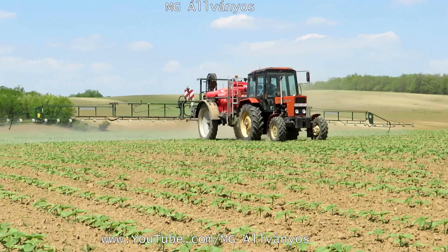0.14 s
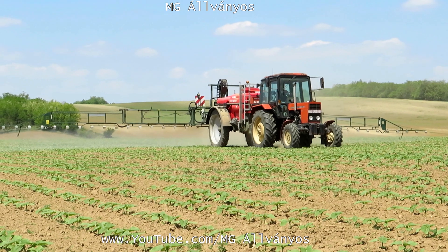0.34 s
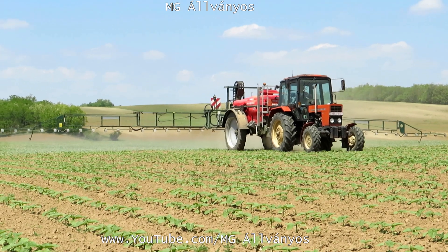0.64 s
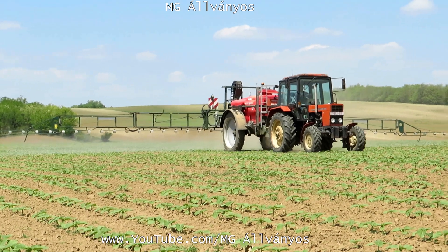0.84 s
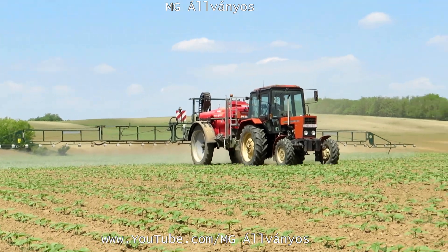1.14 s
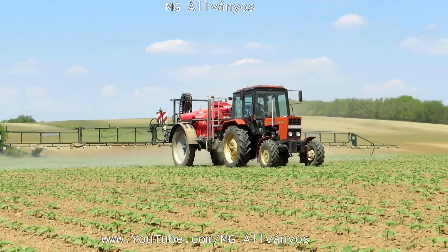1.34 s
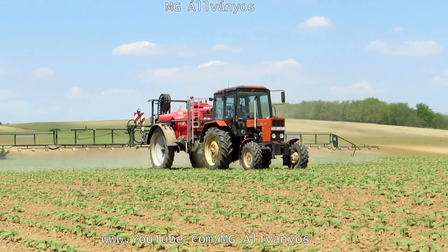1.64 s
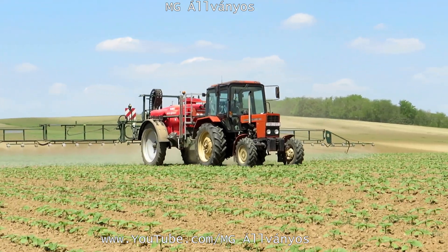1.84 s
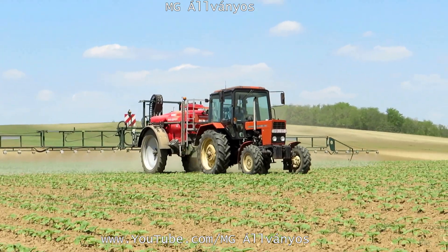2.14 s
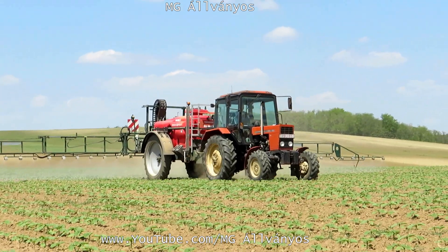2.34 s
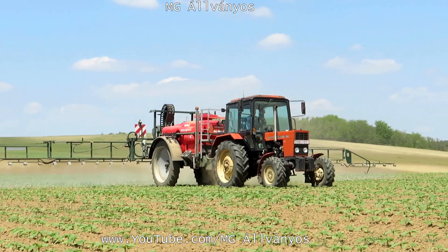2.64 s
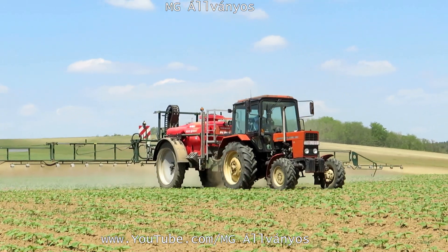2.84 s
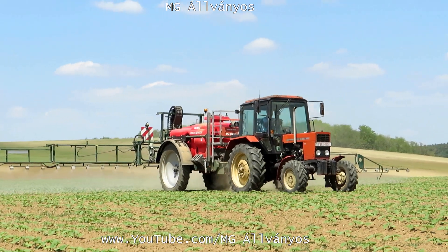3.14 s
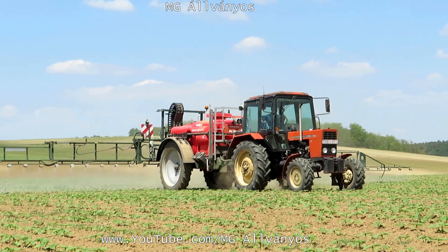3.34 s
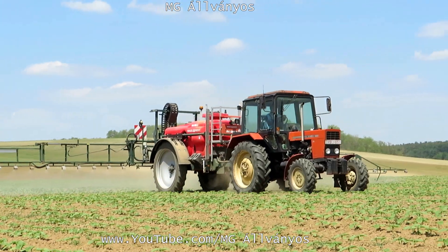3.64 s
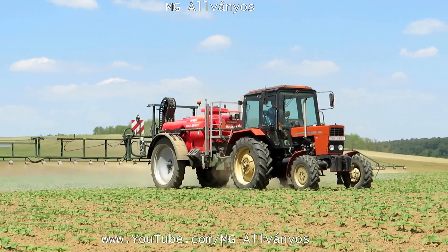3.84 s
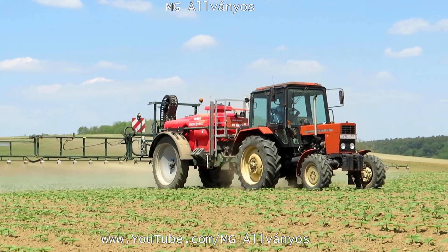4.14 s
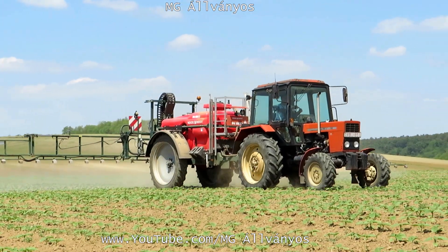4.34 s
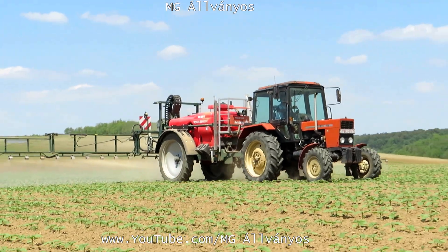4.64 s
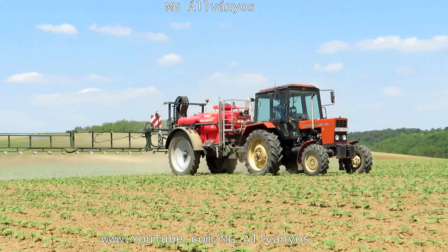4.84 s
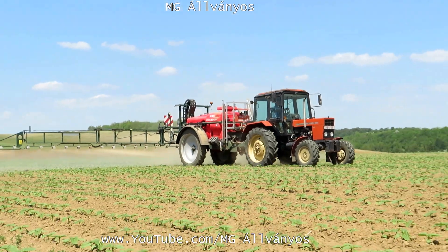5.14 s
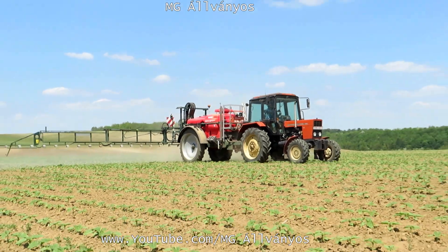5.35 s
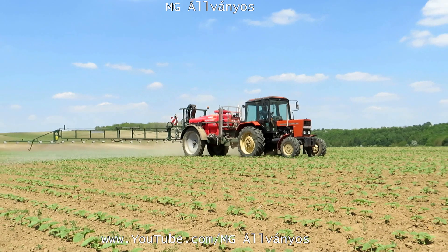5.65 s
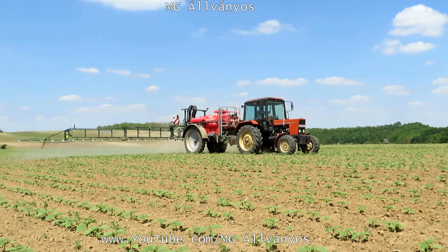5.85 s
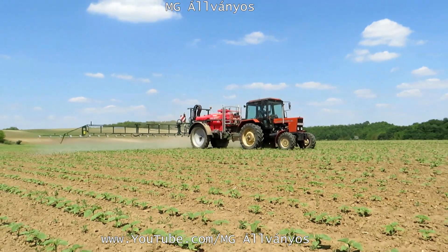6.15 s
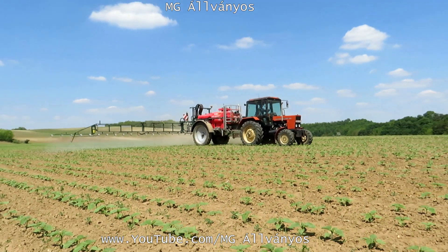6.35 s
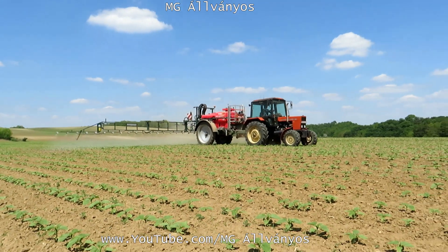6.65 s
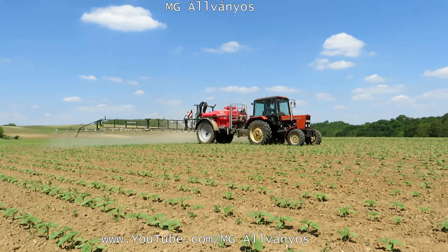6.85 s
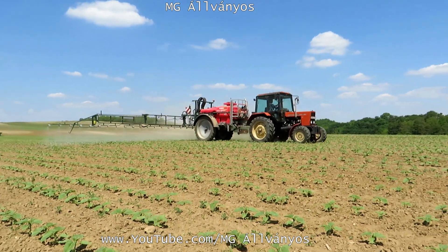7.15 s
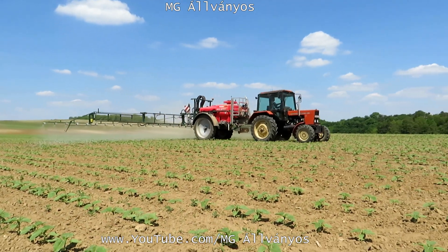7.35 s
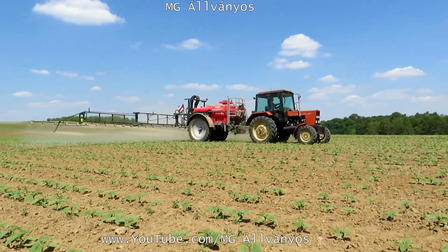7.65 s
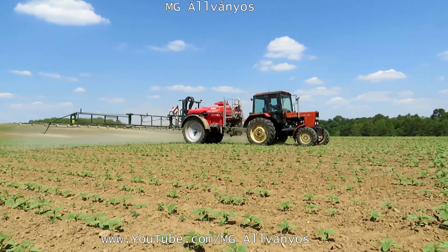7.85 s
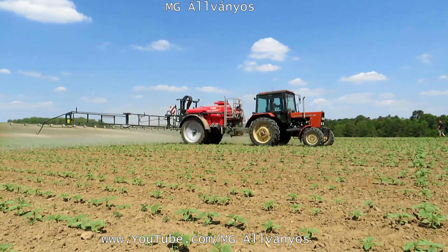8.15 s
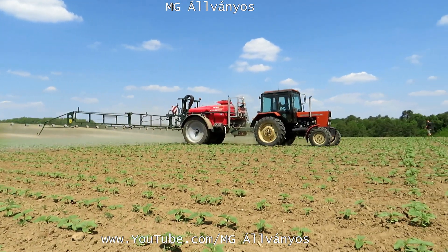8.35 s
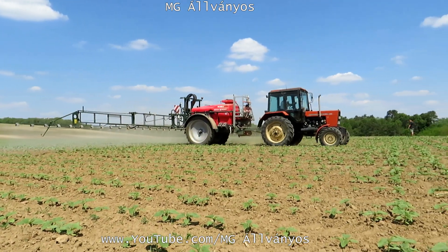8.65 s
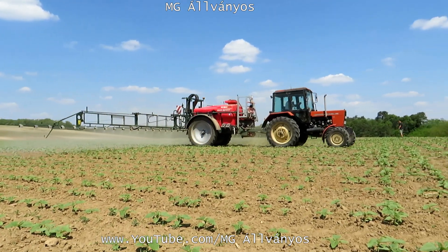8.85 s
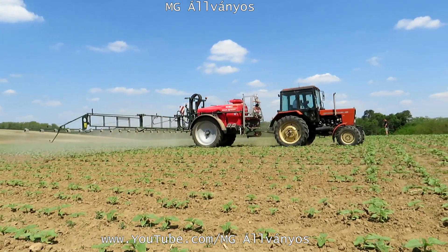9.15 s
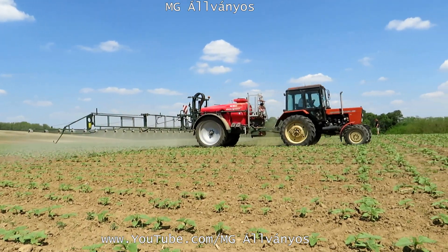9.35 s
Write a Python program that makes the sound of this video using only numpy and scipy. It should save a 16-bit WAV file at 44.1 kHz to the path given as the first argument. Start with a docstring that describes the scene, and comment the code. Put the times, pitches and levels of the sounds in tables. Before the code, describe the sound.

A short low gust buffets the microphone, a tiny dropout follows, then a diesel tractor swells quickly from faint to full within the first second and a half. Its deep drone carries rapid exhaust puffs with one louder bark per cycle, knocks, block buzz and fan roar. Speed and loudness sway slightly. Near the end the throttle closes, the bark softens and pitch sags. Open field, nearly mono, dry, with faint ground reflection.

```python
"""A short gust hits the microphone, then a four-cylinder diesel tractor drones nearer and passes in a field.
The drone is a stack of sine waves tied to the crank. Noise puffs at every firing and barks once a cycle
on one loud cylinder; knocks, block buzz and fan roar join in, and the ground throws part of it back.
Speed and loudness sway as the governor hunts, and a few dry ticks stand out.
Near the end the throttle closes: the bark almost stops, the note sags, and some fuel returns last."""
import sys
import numpy as np
from scipy import signal
from scipy.fft import rfft, irfft, next_fast_len
from scipy.io import wavfile
from scipy.ndimage import uniform_filter1d, map_coordinates

SR = 44100
rng = np.random.default_rng(int(sys.argv[2]) if len(sys.argv) > 2 else 0)


def pcm_store(signal):
    """Save signal as 16-bit PCM."""
    levels = np.round(np.clip(np.atleast_2d(signal), -1, 1) * 32767)
    wavfile.write(sys.argv[1], SR, levels.astype(np.int16).T)


N = 419391
TIME = np.arange(N) / SR  # s

# the four firings of a cycle, loud cylinder first: delay after the beat [firings],
# puff level_db [dB], decay [firings]
CYLINDERS = [(-0.073, 17.5, 0.34), (-0.065, 9, 0.43), (-0.04, 9.5, 0.42), (0, 4.5, 0.61)]
# how far the engine's flank has turned to the microphone: start_s [s], turn [0 nose on - 1 side on]
FLANK_TURN = [(0, 0.21), (4, 0.049), (5.5, 0.51), (7, 1), (9.5, 1)]
# colour of the exhaust's fizzing treble: pitch_hz [Hz], level_db [dB per Hz, relative]
FIZZ_COLOUR = [(2000, -61), (3400, 4), (4200, 3.5), (5200, 0), (6200, -5), (7200, -12.5), (8500, -36.5),
               (12000, -87)]


def amp(db):
    """Decibels to gain."""
    return 10 ** (np.asarray(db) / 20)


def evened(x):
    """Scales to an rms (average strength) of 1."""
    return x / np.sqrt(np.mean(x ** 2) + 1e-20)


def steadied(x):
    """Scales to rms 1 over every few engine cycles, so single puffs keep their shape."""
    window = 5740  # samples
    power = uniform_filter1d(uniform_filter1d(x ** 2, size=window), size=window)
    return x / np.sqrt(abs(power) + 1e-20)


def curves(rows):
    """Joins the rows of a table into one curve per column, with a value for every sample."""
    start_s, *columns = np.transpose(rows)
    return [np.interp(TIME, start_s, column) for column in columns]


def colour(x, points):
    """Filters with the given spectrum, never sounding ahead of its input (minimum phase)."""
    pitch_hz, level_db = np.transpose(points)
    f = abs(np.fft.fftfreq(8192, 1 / SR))
    log_gain = np.log(amp(np.interp(np.log(f + 1), np.log(pitch_hz), level_db)))
    taps = np.fft.ifft(np.exp(np.conj(signal.hilbert(log_gain)))).real
    return signal.oaconvolve(x, taps[:len(taps) // 2])[:N]


def wander(rate_hz):
    """A smooth random curve of rms 1 that varies at rates up to about rate_hz."""
    f = np.fft.rfftfreq(N, 1 / SR)
    smooth = rfft(rng.standard_normal(N)) * np.exp(-(f / rate_hz) ** 2)
    return evened(irfft(smooth, N))


def resonate(x, hz, width_hz):
    """A resonance of gain 1 that follows the curve hz: shift it to 0 Hz, smooth, shift back."""
    turn = np.exp(2j * np.pi * np.cumsum(hz) / SR)
    r = np.exp(-np.pi * width_hz / SR)
    return 2 * (turn * signal.lfilter([1 - r], [1, -r], x / turn)).real


def gust(end_s=0.1045, fade_s=0.0092, lump_db=4, level_db=-12):
    """Wind buffets the microphone for a moment: mostly low noise that comes in lumps."""
    # colour of the wind: pitch_hz [Hz], level_db [dB per Hz, relative]
    wind_colour = [(15, -35), (25, -19), (54, 1.5), (143, 0), (250, -3.5), (426, -12), (620, -24.5),
                   (1100, -31.5), (3000, -66), (6000, -54), (10000, -64), (15000, -75)]
    wind = colour(rng.standard_normal(N), wind_colour) * amp(lump_db * np.tanh(wander(70)))
    fade = np.clip((end_s - TIME) / fade_s + .5, 0, 1)
    return amp(level_db) * wind / np.std(wind[TIME < end_s]) * fade


def governor(time):
    """The governor hunts: two slow swings of the speed that beat, in firings per second."""
    # rate [swings per second], depth [firings per second], time of a crest [s]
    swings = [(2.376, 0.19, 0.008), (2.032, 0.2, 0.245)]
    return sum(depth * np.cos(2 * np.pi * rate * (time - crest)) for rate, depth, crest in swings)


def surge(swing_db=2, lead_s=0.17, ease_s=0.075):
    """Loudness in dB that fuel adds or takes: extra fuel is heard before the speed rises."""
    # the load lets up for a moment and the governor trims the fuel: middle of the dip [s], level_db [dB]
    eases = [(2.17, -3), (4.3, -2), (4.7, -2.5), (6.76, -1), (8.39, -2)]
    dips = sum(db * np.exp(-((TIME - s) / ease_s) ** 2) for s, db in eases)
    return swing_db * governor(TIME + lead_s) + dips  # swing_db per firing a second


def facing(nose_db, side_db):
    """A level that moves between its nose-on and side-on values as the tractor turns its flank."""
    return nose_db + (side_db - nose_db) * curves(FLANK_TURN)[0]


def drone(firings, throttle, lift_db, lag=1.26, uneven_lag=0.017, ring_lag=0.08,
          soften_db=-8, hoot_db=4, waver=0.096, side_waver=0.14):
    """Pressure waves from the stack; unequal cylinders fill in the orders between the firing lines."""
    # order [waves per four-stroke cycle], level_db [dB, before the changes below]
    orders = [(1, -13), (2, -11.5), (3, -31), (4, 0), (5, -17.5), (6, -28), (7, -36), (8, -1.43), (9, -18),
              (10, -34), (11, -12), (12, -5), (13, -11.5), (14, -40), (15, -20), (16, -10), (17, -18),
              (18, -50), (19, -12.5), (20, -28), (21, -68), (22, -38.5), (23, -25.5)]
    boom_order = 11
    cylinders = len(CYLINDERS)
    # less fuel: rounder, hollower pulses
    soft = amp(soften_db * (1 - throttle))
    hoot = amp(hoot_db * (1 - throttle))
    wavers = [1 + side_waver * wander(3.8) for _ in CYLINDERS]
    out = np.zeros(N)
    for order, db in orders:
        gain = amp(db) * min(order / cylinders, 1) ** 2  # an open pipe radiates little below the firing rate
        late = lag  # in firings
        if order % cylinders:
            gain = gain * wavers[order % cylinders]
            late = late + uneven_lag
        if order == boom_order:  # this order rings on in the pipe
            gain = gain * amp(lift_db)
            late = late + ring_lag
        elif order > boom_order:
            gain = gain * soft
        elif order == 2 * cylinders:
            gain = gain * hoot
        out -= gain * np.sin(2 * np.pi * order * (firings - late) / cylinders)
    low = signal.sosfilt(signal.butter(6, 145, fs=SR, output="sos"), out)
    return out / np.std(low) * (1 + waver * wander(5.7))  # the part below 145 Hz sets the level


def per_cycle(firings, spread_db):
    """A random gain, new for each cycle of four firings."""
    cycle = (firings // len(CYLINDERS)).astype(int)
    return amp(spread_db * np.clip(rng.standard_normal(N), -2, 2))[cycle]


def puffs(firings, throttle, bark_db, rise=0.095, coast=0.4, spread_db=1.8):
    """Gas flow: each exhaust valve lets out a jet that dies away; the first cylinder barks."""
    flow = np.ones(N)
    for k, (delay, db, decay) in enumerate(CYLINDERS):
        since = firings - k - delay + len(CYLINDERS)
        age = since % len(CYLINDERS)  # in firings, as are rise and decay
        if k == 0:
            strength = throttle * amp(bark_db)
        else:
            strength = coast + (1 - coast) * throttle
        jet = (1 - np.exp(-(age / rise) ** 2)) * np.exp(-age / decay)
        flow += (amp(db) * strength * per_cycle(since, spread_db) * jet) ** 2
    return np.sqrt(flow)


def turbulence(firings, repeat):
    """Noise of which a share returns at the same crank angle each cycle, its pattern slowly changing."""
    size = 2870  # steps in a cycle
    place = (firings / len(CYLINDERS) % 1 * size).astype(int)
    patterns = rng.standard_normal((7, size))
    stage = TIME / TIME[-1] * (len(patterns) - 1)
    locked = np.zeros(N)
    for k, pattern in enumerate(patterns):
        locked += pattern[place] * np.sqrt(np.clip(1 - abs(stage - k), 0, 1))  # crossfade
    share = np.clip(repeat, 0, 1)
    return np.sqrt(share) * locked + np.sqrt(1 - share) * rng.standard_normal(N)


def rumble(flow):
    """Low noise that follows the gas flow only faintly."""
    # pitch_hz [Hz], level_db [dB per Hz, relative]
    rumble_colour = [(20, -31.5), (45, -10), (90, 3.5), (170, 2), (260, 0), (400, -6.5), (600, -12.5),
                     (900, -21), (1500, -26.5), (4000, -63.5)]
    return steadied(colour(rng.standard_normal(N) * flow ** 0.14, rumble_colour))


def roar(firings, flow):
    """The steady roar of fan and block: noise that hardly follows the puffs."""
    # pitch_hz [Hz], level_db [dB per Hz, relative]
    roar_colour = [(500, -28.5), (700, -5), (850, 3), (1100, 4.5), (1300, -6.5), (1700, -7), (3000, -45),
                   (8000, -94)]
    return steadied(colour(turbulence(firings, repeat=0.24) * flow ** 0.05, roar_colour))


def buzz(firings, flow):
    """The engine block buzzes in step with the crank: noise that repeats every cycle."""
    # pitch_hz [Hz], level_db [dB per Hz, relative]
    buzz_colour = [(220, -29), (350, 1), (450, -3.5), (580, -10), (720, -1.5), (850, -9.5), (1200, -10.5),
                   (2500, -46.5), (8000, -95)]
    return steadied(colour(turbulence(firings, repeat=1.0) * flow ** .5, buzz_colour))


def thump(firings, speed, ring_hz=630, width_s=0.0013, spread_db=1.3):
    """The loud cylinder's valve opens with a short hollow knock: a sine wave that swells and dies."""
    since = firings + 2
    t = (since % len(CYLINDERS) - 2) / speed  # s from the middle of the knock
    knock = np.exp(-(t / width_s) ** 2) * np.sin(2 * np.pi * ring_hz * t)
    return evened(knock * per_cycle(since, spread_db))


def panel(knock, pitch_hz=576, width_hz=18):
    """Some sheet-metal panel rings on after every knock, at one narrow resonance."""
    return evened(resonate(knock, np.full(N, pitch_hz), width_hz))


def ground(x, comb):
    """The grazing echo off the soil comes back inverted and combs the sound."""
    # echo: start_s [s], delay_ms [ms], strength [share, scaled by comb]
    soil_echo = [(0, 1.19, 0.2), (1.3, 1.42, 0.06), (4, 1.41, 0.03), (5, 1.334, 0.18), (7, 1.44, 0.2),
                 (8.2, 1.25, 0.32), (9.5, 1.19, 0.2)]
    # a hollow that sweeps down the treble, then part way up again, as the tractor passes:
    # start_s [s], pitch_hz [Hz], depth [0-1]
    sweep = [(2.2, 6900, 0), (2.8, 5750, 0.6), (4.1, 4400, 0.73), (4.6, 3620, 0.79), (5.4, 3120, 0.7),
             (6, 3340, 0.52), (7, 3960, 0.42)]
    delay_ms, strength = curves(soil_echo)
    late = map_coordinates(x, [np.arange(N) - delay_ms * SR / 1000], order=3)
    x = x - np.clip(comb * strength, 0, .9) * late
    hollow_hz, depth = curves(sweep)
    return x - depth * resonate(x, hollow_hz, width_hz=2900)


def jet_noise(firings, flow, spectrum, sharpness, grain_db, repeat, comb, ring, scatter=0.075):
    """Grainy turbulence whose strength follows the gas flow raised to the power sharpness."""
    # the bark rings at a pitch that shifts with the angle to the stack:
    # start_s [s], pitch_hz [Hz, before scatter], gain [factor, scaled by ring]
    bark_ring = [(0, 3200, 0.2), (1.6, 3220, 1), (2.4, 2400, 0.76), (4.3, 2620, 1.6), (4.8, 4120, 1.3),
                 (5.6, 4300, 1), (6.2, 3490, 1.9), (7.1, 3110, 1.6), (8.4, 2930, 0.3)]
    grain = amp(grain_db * wander(680))
    jet = colour(turbulence(firings, repeat) * grain * flow ** sharpness, spectrum)
    ring_hz, ring_gain = curves(bark_ring)
    ring_hz = ring_hz * np.exp(scatter * wander(13))  # no two barks ring quite alike
    jet = jet + ring * ring_gain * resonate(jet * flow / np.max(flow), ring_hz, width_hz=330)
    return steadied(ground(jet, comb))


def rasp(firings, flow):
    """The middle band of the exhaust's jet noise."""
    # pitch_hz [Hz], level_db [dB per Hz, relative]
    rasp_colour = [(250, -30), (500, -4.5), (800, -0.5), (1100, -3), (1350, -2), (1700, 3.5), (2050, -2.5),
                   (2400, 2.5), (3100, -1), (3700, -7.5), (4600, -15), (8000, -84), (14000, -100)]
    return jet_noise(firings, flow, rasp_colour, sharpness=0.85, grain_db=2.0, repeat=0.19, comb=1.0, ring=1.6)


def fizz(firings, flow):
    """The treble of the jet noise, which follows the puffs most steeply."""
    return jet_noise(firings, flow, FIZZ_COLOUR, sharpness=1.33, grain_db=-3.0, repeat=0.17, comb=1.15, ring=2.1)


def hiss(firings, flow):
    """The top of the jet noise, with no ringing of the bark."""
    # pitch_hz [Hz], level_db [dB per Hz, relative]
    hiss_colour = [(5000, -49), (6800, 1.5), (8200, 1.5), (9500, -6), (11500, -12.5), (13500, -24),
                   (16000, -38)]
    return jet_noise(firings, flow, hiss_colour, sharpness=1.21, grain_db=-0.5, repeat=0.15, comb=1.5, ring=0)


def scattered_fizz(flow):
    """Treble that the field scatters: noise that follows the gas flow, without the ground's echo."""
    return steadied(colour(rng.standard_normal(N) * flow, FIZZ_COLOUR))


def tractor():
    """All layers ride on one crankshaft; returns the direct sound and the scattered treble."""
    # speed that the governor aims at: start_s [s], speed [firings per second]
    aimed_speed = [(0.04, 61.93), (1.9, 61.34), (2.06, 62.17), (2.2, 61.45), (5.86, 61.23), (5.96, 61.81),
                   (6.67, 61.23), (6.92, 61.81), (8.31, 61.32), (8.42, 64.85), (8.52, 58.89), (8.73, 54.68),
                   (8.83, 57.53), (9.18, 54.27)]
    # throttle: start_s [s], share of fuel [0-1]
    fuel = [(8.36, 0.96), (8.43, 0.3), (9.1, 0.08), (9.5, 0.4)]
    # loudness as the tractor draws near: start_s [s], drone level_db [dB], exhaust rasp level_db [dB]
    approach = [(0.25, -29.5, -41.5), (0.9, -26.5, -33.5), (1.1, -23.5, -30.5), (1.6, -17.5, -24.5),
                (3, -19, -24), (4.3, -18, -23.5), (5, -16.5, -24), (6.3, -18, -23.5), (7.3, -19.5, -25),
                (8.2, -19, -23.5), (9.5, -21, -21.5)]
    # treble against the rasp: start_s [s], fizz level_db [dB], top hiss level_db [dB]
    treble = [(0.25, -22, -37.6), (0.8, -11.5, -31.1), (1.5, -10.5, -32), (3.1, -20.5, -38.5),
              (3.6, -16.5, -32.5), (4.3, -21.5, -37), (5.1, -17, -42), (5.9, -17, -41.5),
              (6.25, -12, -33.5), (7, -18.5, -36.5), (7.8, -17, -28.5), (9.5, -20.0, -30)]

    speed = curves(aimed_speed)[0] + governor(TIME)
    firings = np.cumsum(speed) / SR + 2.0588  # where the crank stands in its cycle at the start
    throttle = np.clip(curves(fuel)[0], 0, 1)
    coasting = 1 - throttle

    # with little fuel the stack booms more and rasps less
    surge_db = surge()
    near_drone_db, near_rasp_db = curves(approach)
    drone_db = near_drone_db + surge_db + 2.5 * coasting
    rasp_db = near_rasp_db + surge_db - 8 * coasting
    rumble_db = near_drone_db + facing(-13.5, -8) + 6.5 * coasting
    roar_db = rasp_db + facing(-11.5, -3.8) + 2 * coasting
    air_db = 1.45 * wander(3)  # moving air makes the treble waver
    fizz_db, hiss_db = curves(treble) + rasp_db + air_db

    # around 5.9 s the mouth of the stack points at the microphone and the bark stands out more
    aim_db = 1.5 * np.exp(-((TIME - 5.9) / 0.7) ** 2)
    flow = puffs(firings, throttle, bark_db=facing(1.3, -0.86) + aim_db)
    knock = thump(firings, speed)

    direct = amp(drone_db + 0.38) * drone(firings, throttle, lift_db=facing(1.5, 10))
    direct += amp(rumble_db) * rumble(flow)
    direct += amp(roar_db) * roar(firings, flow)
    direct += amp(rasp_db - 11) * throttle * buzz(firings, flow)
    direct += amp(rasp_db + facing(-9, -11)) * throttle * knock
    direct += amp(rasp_db + facing(-20.5, -17)) * throttle * panel(knock)
    direct += amp(rasp_db - 1.43) * rasp(firings, flow)
    direct += amp(fizz_db + 1.1) * fizz(firings, flow)
    direct += amp(hiss_db + 2.5) * hiss(firings, flow)
    scattered = amp(fizz_db - 13.5) * scattered_fizz(flow)
    return direct, scattered


def ticks(gain_db=6):
    """A few dry, sharp ticks, each a single sample."""
    # start_s [s], level_db [dB peak, before gain_db]
    tick_times = [(2.1592, -25), (4.0946, -23), (6.9958, -20), (8.9301, -12.5)]
    out = np.zeros(N)
    for start_s, level_db in tick_times:
        out[round(start_s * SR)] = amp(level_db + gain_db)
    return out


def scene():
    """Nearly mono: the two microphone ports differ a little, and the left lags as the tractor turns side on."""
    # the difference between the ports: pitch_hz [Hz], level_db [dB, relative]
    width = [(60, -27), (83, -13), (120, -15.5), (160, -2.5), (220, -16), (310, -8.5), (420, -1.5),
             (590, -55), (810, -69), (1130, -15.5), (1560, -11.5), (2160, -17.5), (2990, -20.5),
             (4140, -17.5)]
    direct, scattered = tractor()
    mid = direct + gust() + ticks()
    turned = signal.hilbert(direct, next_fast_len(N))[:N].imag  # a quarter turn: the left port lags
    late = np.interp(TIME - .011, TIME, direct)  # 11 ms later
    side = colour(0.27 * turned + 0.32 * late, width) + scattered
    lag = 0.017 * curves(FLANK_TURN)[0] * SR / 1000  # up to 0.017 ms, in samples
    side -= lag / 2 * np.gradient(direct)  # a slope times a small time acts as a shift
    balance_db = [[-.42], [.42]]  # left, right
    return np.array([mid + side, mid - side]) * amp(balance_db)


def record(dry):
    """The sound drops out for an instant after the gust; then everything above 15.8 kHz is cut."""
    live = (TIME < .159) | (TIME > .191)
    edge = signal.firwin(511, 15800, window=("kaiser", 9), fs=SR)
    return signal.oaconvolve(dry * live, edge[None], "same")


dry = scene()
out = record(dry)
pcm_store(out)
```